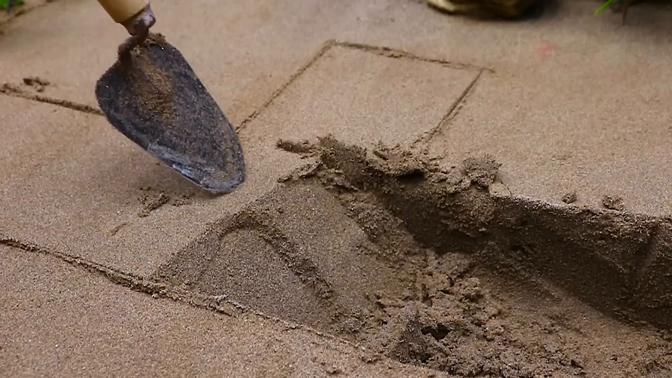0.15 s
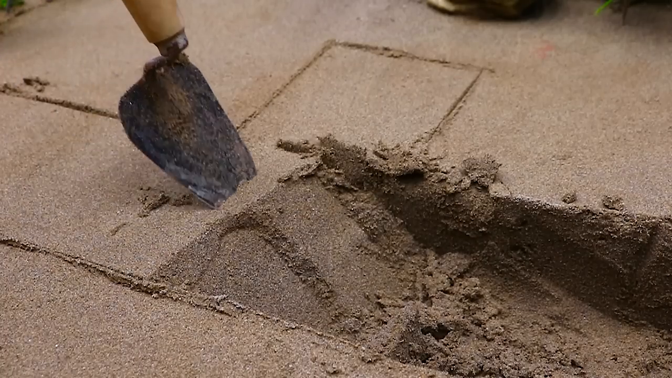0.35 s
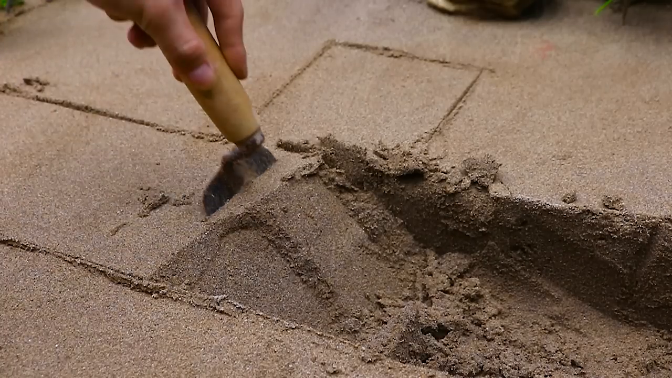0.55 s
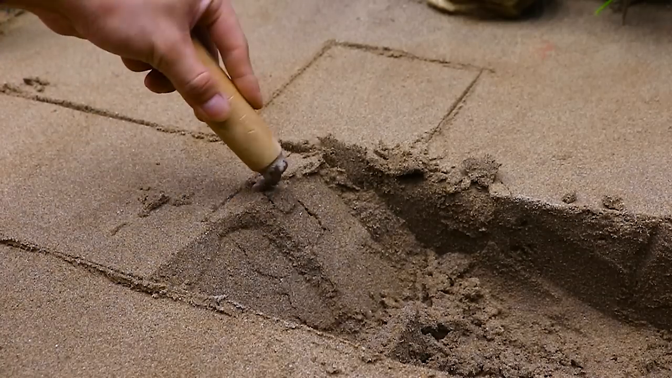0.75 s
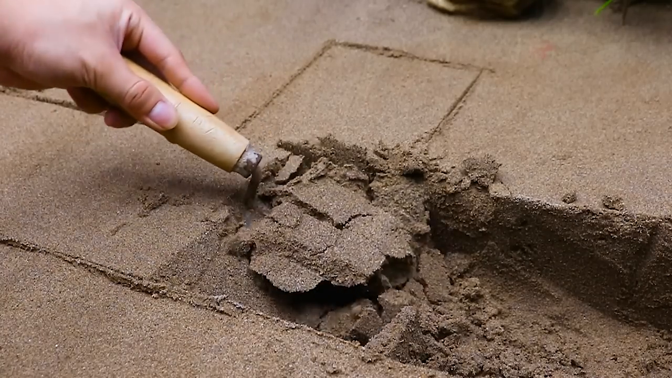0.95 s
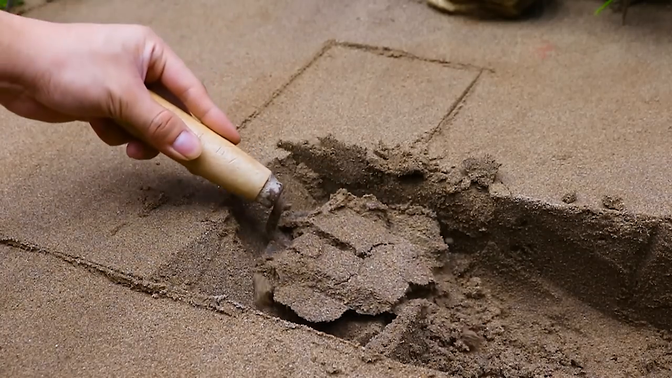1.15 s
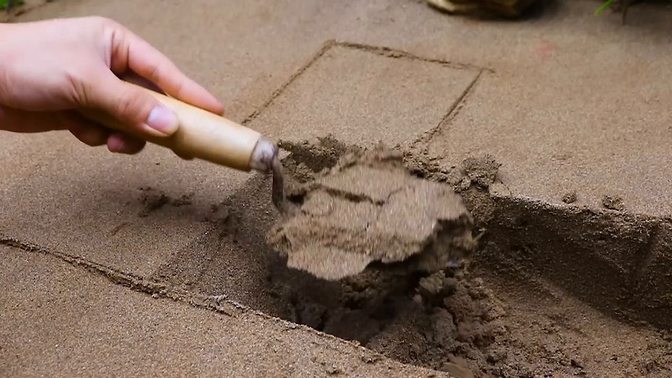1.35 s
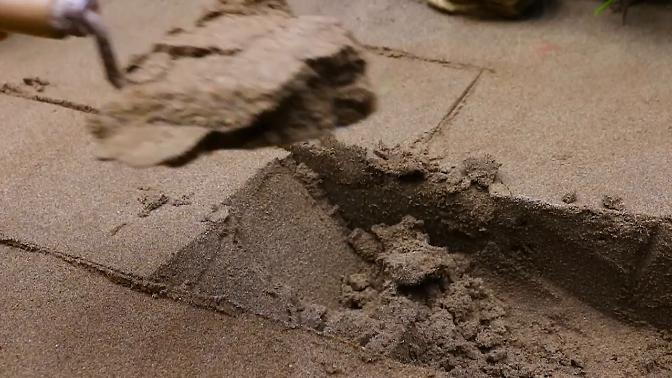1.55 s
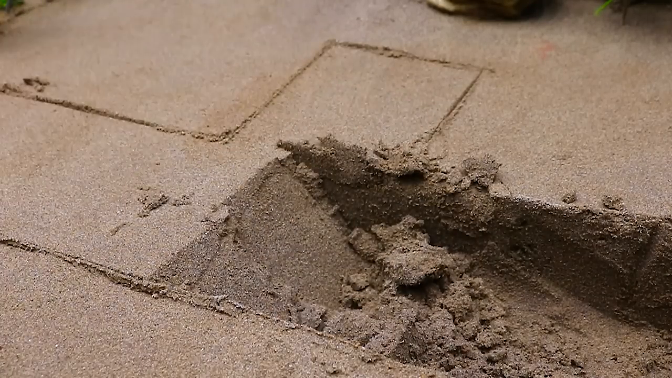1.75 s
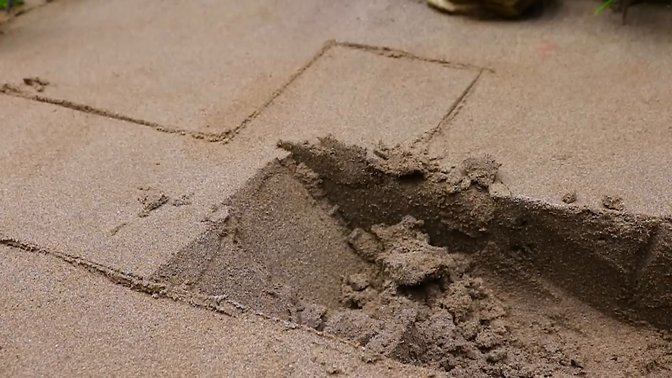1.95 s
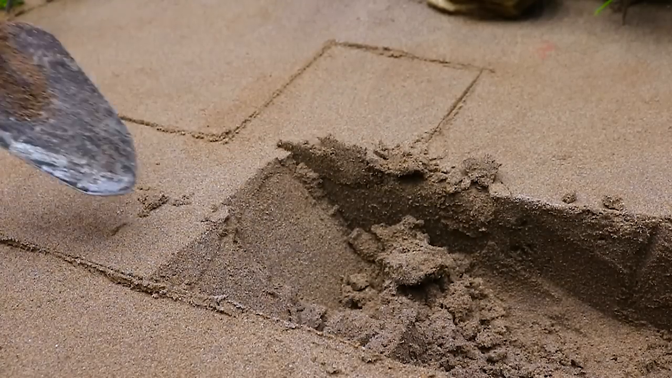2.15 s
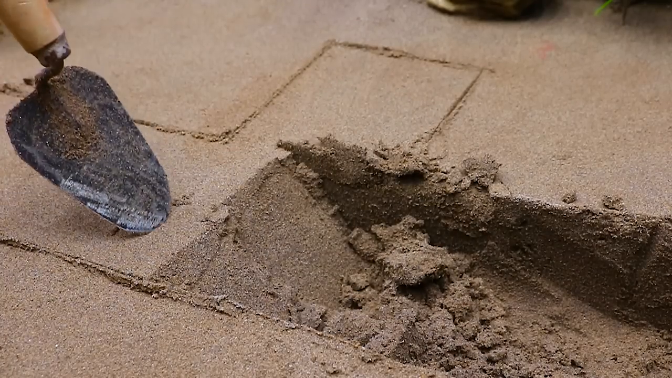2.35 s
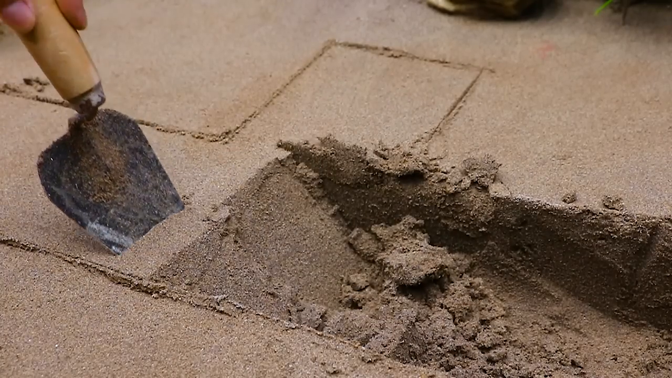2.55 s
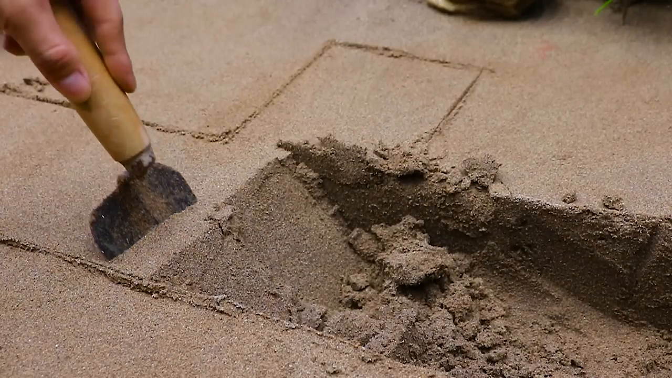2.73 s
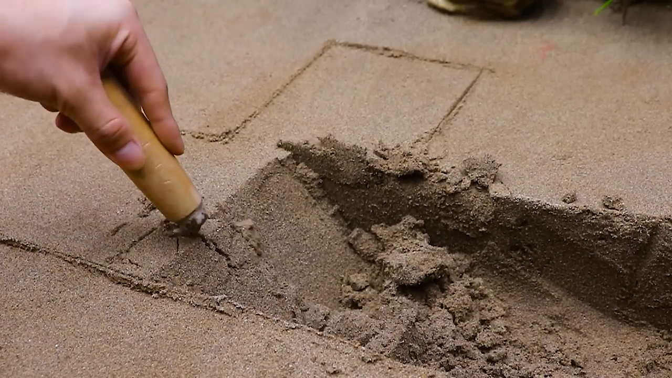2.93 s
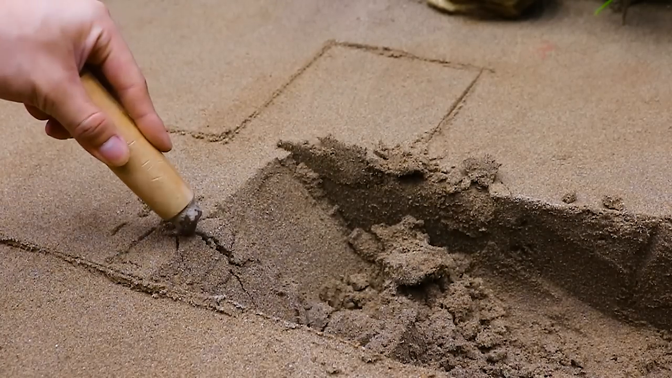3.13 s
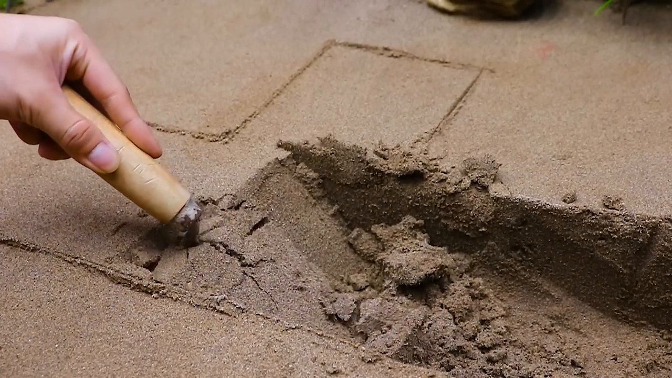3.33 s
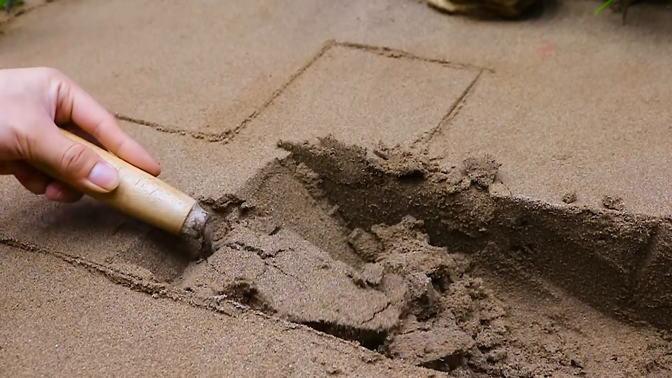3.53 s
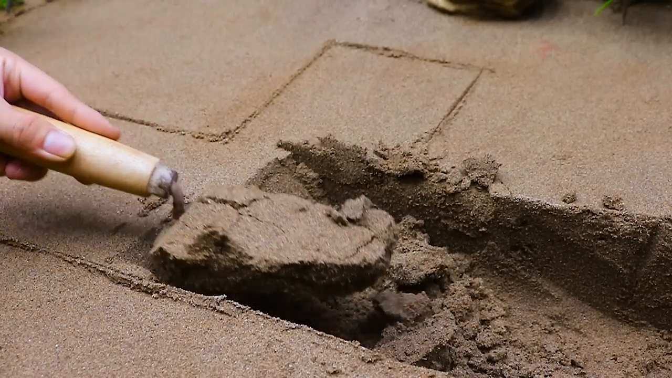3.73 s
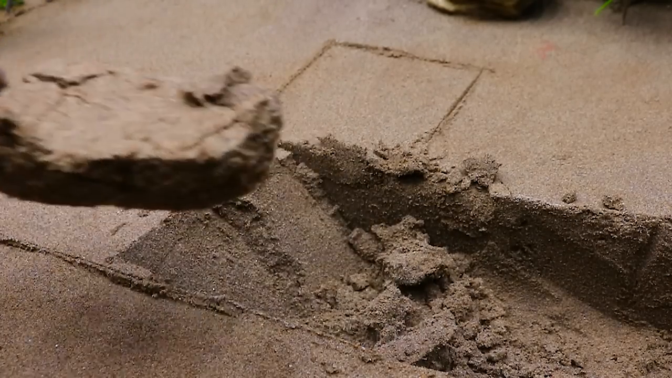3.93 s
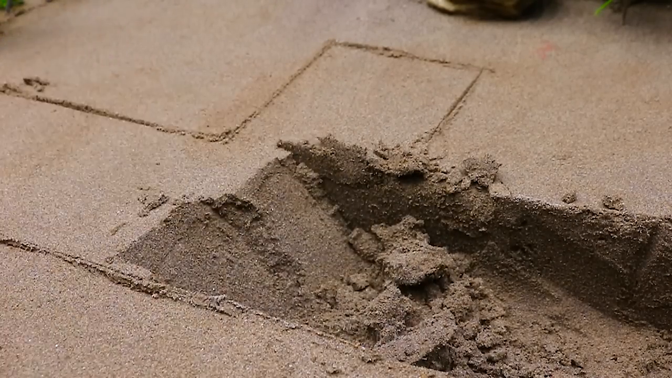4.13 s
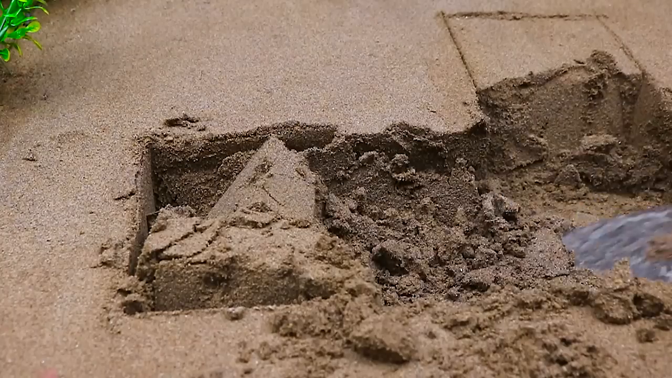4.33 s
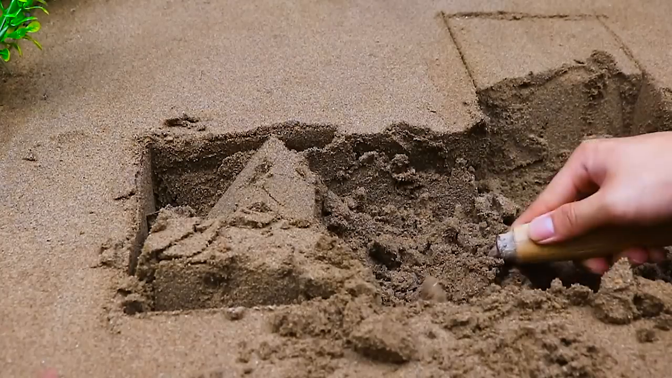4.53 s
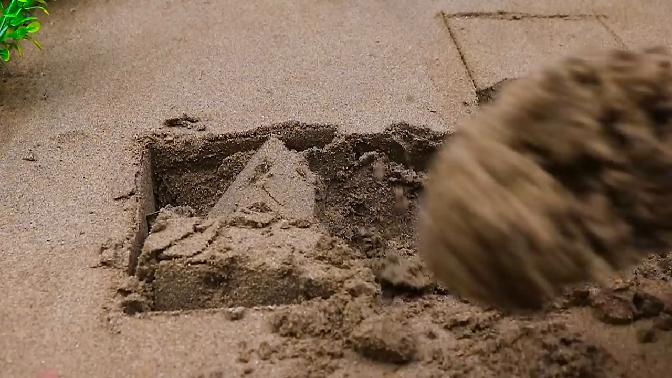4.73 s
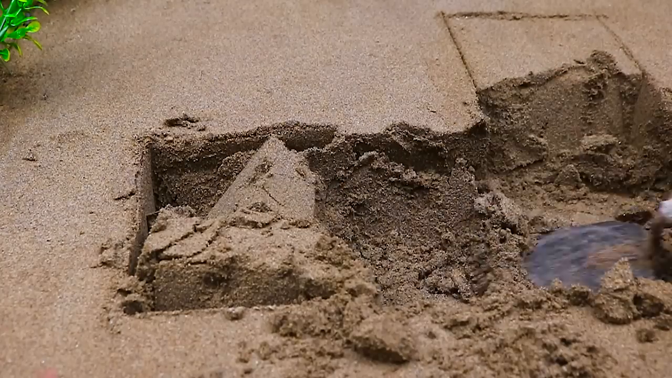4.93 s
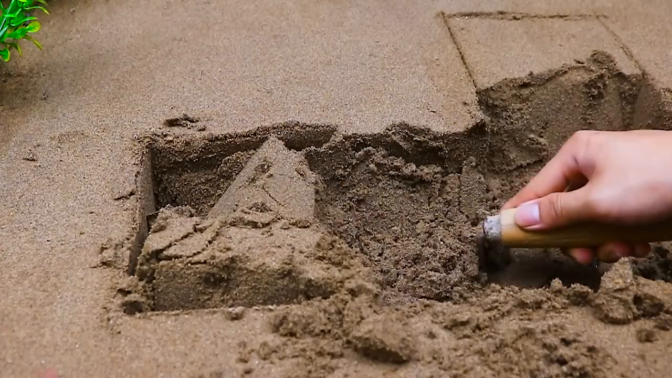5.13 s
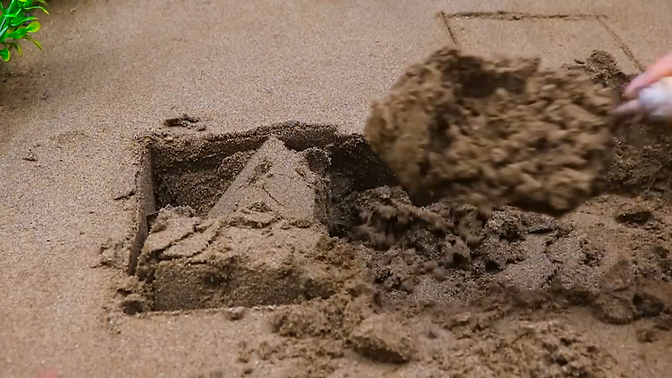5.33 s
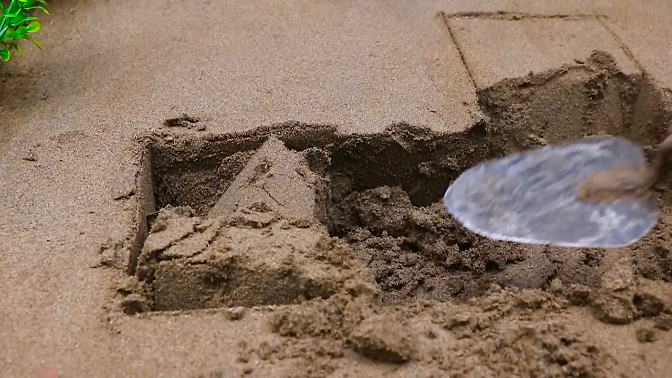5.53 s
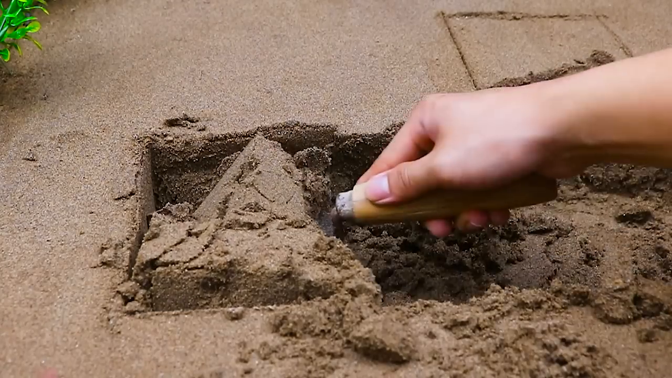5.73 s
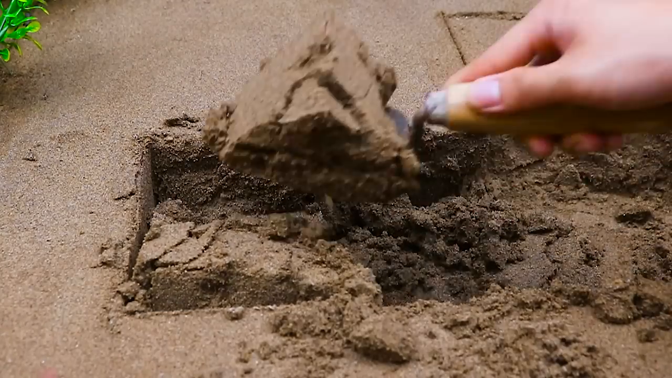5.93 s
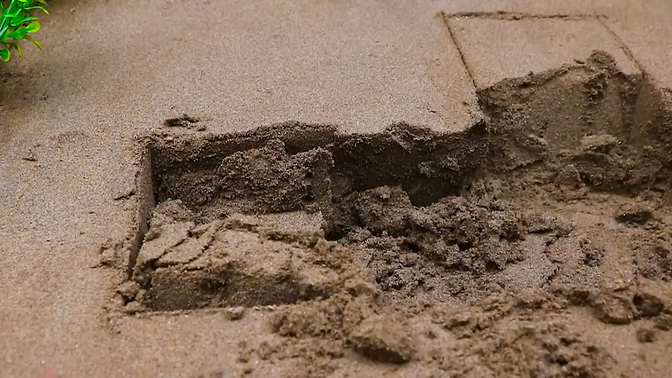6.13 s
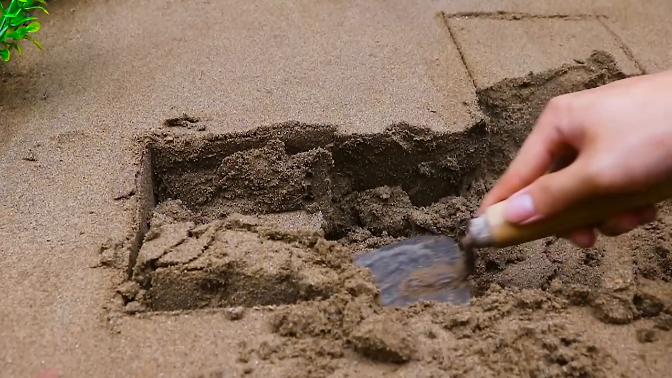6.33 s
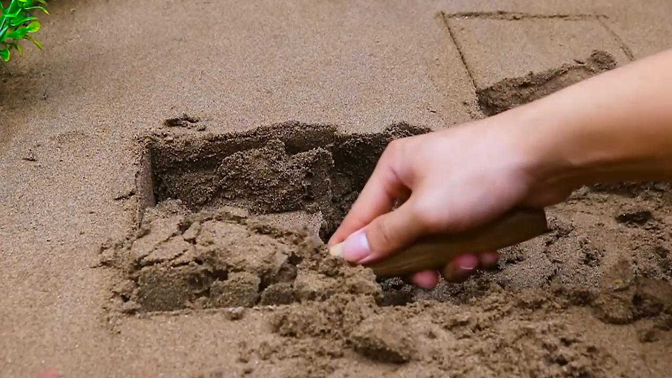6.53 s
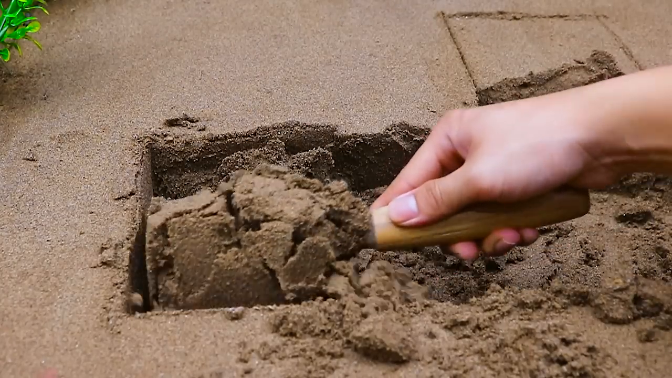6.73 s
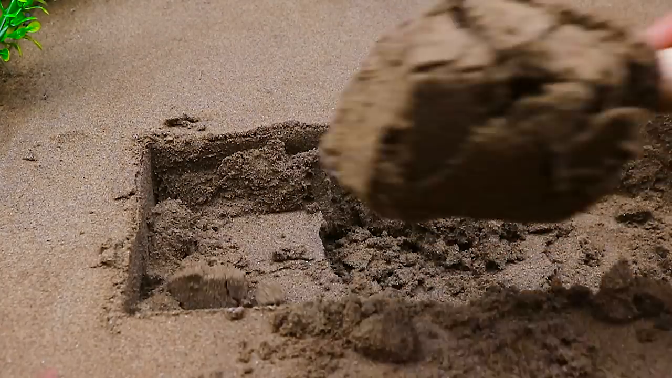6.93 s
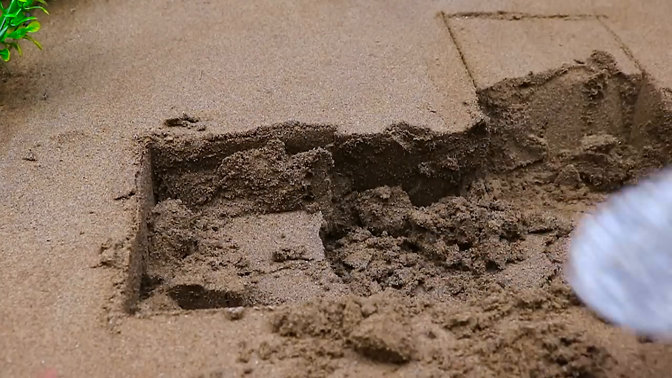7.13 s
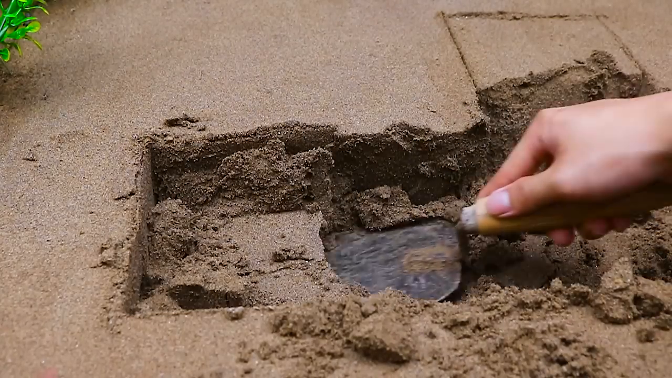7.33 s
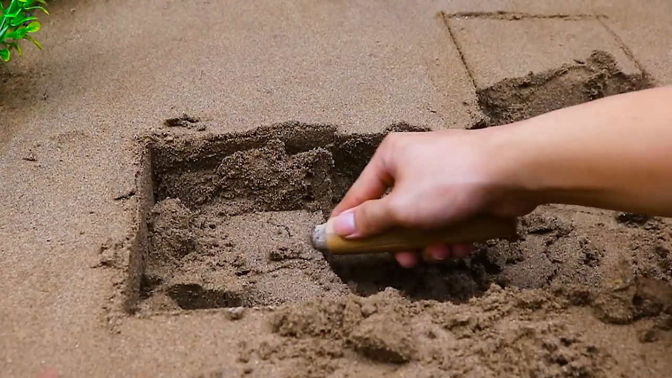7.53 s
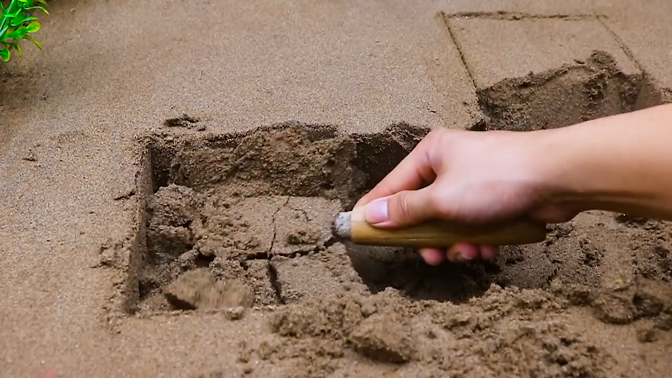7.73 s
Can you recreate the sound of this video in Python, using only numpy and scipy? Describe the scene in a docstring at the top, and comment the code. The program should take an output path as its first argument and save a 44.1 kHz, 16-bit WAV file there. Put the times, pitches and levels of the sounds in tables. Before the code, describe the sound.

A small steel trowel stabs and pushes crisply through damp sand close by, while songbirds chatter over a soft airy outdoor hush.

```python
"""Birds chatter over an airy hush; at 0.4 s a small steel trowel starts digging damp sand close by.
Five quick stabs and two slow pushes: random grain impacts, filtered by blade resonances, hiss, rasp and crunch.
A sine thud marks each stop; noise bursts and grains make the loosened sand, snaps and clods.
Birds are gliding tones with an echo of trees; at 2 to 3 s a low hum, a narrow noise band, swells twice.
At 4 s the filtered-noise hush gives way to a quieter one, and a nearer bird calls twice."""
import sys
import numpy as np
from scipy import signal
from scipy.fft import rfft, irfft, next_fast_len
from scipy.io import wavfile
from scipy.ndimage import uniform_filter1d, map_coordinates

SR = 44100
rng = np.random.default_rng(int(sys.argv[2]) if len(sys.argv) > 2 else 0)


def dump_mix(stems):
    """Bounce the given channels to the path in sys.argv[1] as a 16-bit WAV at rate SR."""
    frames = np.atleast_2d(stems).T  # one column per channel
    limited = np.clip(frames, -1, 1)  # hard clip at full scale
    pcm = np.round(limited * 32767).astype(np.int16)
    wavfile.write(sys.argv[1], SR, pcm)


N = 347067
TOP_HZ = 16000  # recorder band limit

# Open-air hush, spectrum before levelling: (frequency [Hz], relative density [dB])
AIRY_SPECTRUM = [(35, -85.5), (60, -25.5), (129, -28.5), (199, -5.5), (309, 4), (1150, -8), (1560, -6.5),
                 (2200, -8), (2650, -2.5), (3750, -5), (5950, -12.5), (11600, -19), (13400, -23),
                 (15000, -46.5)]
# Quieter hush, likewise: (frequency [Hz], relative density [dB])
CALM_SPECTRUM = [(24, -45.5), (40, -10), (103, -9), (182, -13.5), (568, -9), (1690, -16), (1870, 0),
                 (2340, -17), (2710, -10), (3140, -11.5), (4560, -23), (5160, -24), (5850, -46.5),
                 (15000, -65.5)]
# Level of the airy hush: (time [s], level [dB])
AIRY_LEVEL = [(0, -53), (.35, -53.5), (1.2, -53), (2.05, -55), (2.4, -56), (3.5, -57), (3.994, -56),
              (4.02, -100)]
# Level of the quieter hush: (time [s], level [dB])
CALM_LEVEL = [(3.98, -100), (4.019, -66.5), (5.5, -66.5), (6.3, -69.5), (7.2, -67), (7.87, -60)]
# Swells of the distant hum: (time [s], hold [s], level [dB])
HUM_SWELLS = [(1.8, 0.23, -58.5), (2.6, 0.042, -44)]

# Echo of the trees, before each bird's stretch: (frequency [Hz], t60 [s])
TREE_DECAY = [(1000, 0.82), (2500, 0.92), (5000, 0.77), (10000, 0.35)]
# Far twitter: (start [s], end [s], pitch [Hz], mean level [dB])
TWITTER = [(0, .25, 4210, -64), (0.616, .74, 3850, -59), (1.103, 2.35, 3800, -66),
           (3.142, 3.7, 5080, -70.5), (3.717, 3.92, 4270, -74.5), (6.171, 6.36, 4440, -74.5),
           (6.696, 7.4, 4500, -73)]
# Songbird glides: (time [s], length [s], start [Hz], end [Hz], glide done halfway [share], level [dB])
WHISTLES = [(.243, .022, 2750, 2620, .5, -50), (.638, .025, 4750, 4600, .2, -50),
            (0.932, 0.07, 3090, 2697, 0.98, -31.5), (1.064, 0.062, 2765, 2013, 0.87, -40),
            (1.137, 0.055, 2423, 2907, 1.38, -35), (1.333, .052, 1780, 2300, 0.72, -47.5),
            (1.508, 0.079, 2141, 2590, 0.4, -39.5), (1.663, 0.041, 3970, 4400, 1.2, -47),
            (1.851, .068, 3438, 2955, 0.34, -34.5), (2.102, .034, 1660, 1872, 0.74, -52.5),
            (2.403, 0.072, 2546, 2440, 1.13, -39), (2.828, 0.098, 2184, 2330, .9, -45),
            (2.855, 0.06, 2880, 2784, .5, -50), (2.928, 0.039, 1610, 1686, 1.3, -48),
            (7.137, 0.11, 1927, 1876, 1.4, -69), (7.201, .08, 2775, 2540, .1, -64),
            (7.68, 0.084, 2005, 2355, 1.8, -53)]
# Songbird sweeps: (time [s], middle pitch [Hz], sweep [octaves], level [dB])
CHIPS = [(0.228, 2950, -.4, -52), (.657, 4230, -0.21, -44), (.678, 3450, -.22, -47),
         (.7, 2913, -0.092, -39.5), (.9, 2850, 0.36, -43), (1.038, 3060, 0.45, -41), (1.154, 2907, .2, -35),
         (1.359, 3160, -0.38, -44), (1.5, 3290, -.33, -46.5), (1.574, 2208, -0.55, -40),
         (1.643, 3450, -0.39, -47.5), (1.678, 3150, 0.2, -45.5), (1.783, 3400, -0.55, -44),
         (1.976, 3814, 0.092, -39), (2.025, 3850, -0.27, -53), (2.21, 4200, 0.46, -49),
         (2.236, 3450, 0.27, -43.5), (2.25, 3930, 0.087, -39.5), (2.355, 5700, -0.14, -50.5),
         (2.39, 2753, -0.4, -43), (6.163, 4350, -.2, -62), (6.724, 4380, -0.25, -52.5),
         (7.058, 4500, 0.18, -58), (7.295, 3600, -.2, -62), (7.328, 4560, -.15, -59),
         (7.598, 4560, .1, -54)]
# Runs of weaker chips, up or down by chance: (start [s], end [s], pitch [Hz], mean level [dB])
CHATTER = [(0, .16, 3900, -58), (1.44, 1.8, 4370, -58.5), (1.97, 2.26, 3900, -53)]
CHIP_S = 0.021
CHATTER_GAP_S, CHATTER_SCATTER_OCT, CHATTER_SWEEP_OCT = 0.045, 0.13, 0.33

# Near bird, warble then low slur:
# (warble time [s], level [dB], slur time [s], level [dB], level offset at slur start [dB])
NEAR_CALLS = [(4.083, -31.5, 4.346, -35.5, -0.5), (4.772, -29, 5.047, -35.5, -11.5)]
WARBLE_HZ, SLUR_HZ = (3510, 3873, 2665), (1540, 3000, 1788)  # (start, top, settled)
WARBLE_S, SLUR_S = 0.12, 0.14
FLICK_S, SLIDE_S = 0.021, 0.015  # time up to the top; time constant of the slide down
WARBLE_DEPTH_HZ, WARBLE_ONSET_S = 126, 0.04  # peak swing; time to open up

# Stereo likeness of a broad source: (frequency [Hz], left-right correlation [-1..1])
LIKENESS = [(100, 0.93), (600, 0.9), (1400, 1), (3000, 0.38), (12000, 0.16)]
# Stereo tilt at lean 1, scaled per source: (frequency [Hz], left minus right [dB])
STEREO_TILT = [(100, -1.5), (300, -5), (900, -1.5), (2400, -3.5), (4500, -5), (8000, -4.5), (13000, -5.5)]
# Contact spectrum of grains: (frequency [Hz], relative density [dB])
SAND_SPECTRUM = [(190, -13), (290, -7.5), (430, -8.5), (900, -10.5), (1300, -9.5), (1600, -12),
                 (3000, -12.5), (6000, -11.5), (10000, -10), (15500, -12)]
# Resonances of the buried trowel: (centre [Hz], full width at half the dB gain [Hz], gain [dB])
BLADE_MODES = [(279, 20, 8.5), (360.8, 21, 11), (471.6, 14, 10), (518, 17, 6), (777, 56, 5.5),
               (1096, 73, 5), (1350, 150, 2), (2229, 110, 9), (2388, 400, 6.5), (3267, 36, 10),
               (3510, 160, 6.5), (3520, 80, 1), (3810, 160, 4), (4867, 72, 12.5), (5310, 240, 8),
               (5650, 86, 4.5), (5790, 50, 10.5), (6280, 98, 10.5), (6920, 220, 5.5), (7210, 80, 4.5),
               (8000, 83, -0.5), (9120, 400, 2.5), (9630, 180, 6), (10430, 100, 3), (10730, 55, -11.5),
               (11330, 90, -2.5), (13200, 120, 1.5)]
# Brightness of loose grains on the blade: (frequency [Hz], gain [dB])
LOOSE_BRIGHTNESS = [(500, -1), (1500, -4.5), (4000, -2), (9000, 0), (15000, -2.5)]
# Sand trickling from a lifted clod: (time [s], hold [s], nominal level [dB])
TRICKLES = [(0.703, 0.077, -44), (0.879, 0.076, -49.5), (2.853, 0.19, -52), (3.08, 0.36, -46),
            (3.502, 0.13, -51.5)]
TRICKLE_ATTACK_S, TRICKLE_T60_S = 0.089, 0.27
# Coarse grains snapping on steel: (time [s], nominal peak, before a 6.5 dB trim [dB])
SNAPS = [(2.447, -31), (3.2624, -25.5), (3.3233, -23.5), (3.383, -20.5), (3.3914, -29), (3.4235, -29),
         (3.5036, -31), (3.5424, -30.5), (3.6, -33), (6.348, -25.5)]
# Lumps dropping into the pit: (time [s], nominal level, before an 8 dB boost [dB])
CLOD_DROPS = [(.945, -42.5), (0.975, -45.5), (1.046, -51.5), (6.325, -62.5)]
# Spectrum of a dropped lump: (frequency [Hz], relative density [dB])
CLOD_SPECTRUM = [(40, -9), (120, -19.5), (330, -1), (1000, -12.5), (2500, -13), (8000, -36.5)]

# Layers of a stab, rows crunch, rasp, hiss; climb and release cross at the peak, 3 dB below nominal:
# (contact to peak [s], nominal peak [dB], climb over that time [dB], release [dB/s])
STAB_LAYERS = [(0.087, -27, 17.5, 190.5), (.1, -23, 7, 560), (.095, -21.5, 4, 619.5)]
# Layers of a push, same rows:
# (contact to peak [s], nominal peak [dB], climb over that time [dB], release [dB/s])
PUSH_LAYERS = [(0.23, -24.5, 26.4, 229), (0.23, -27, 7.2, 250), (0.2, -26, 5.5, 240)]
# Stabs: (contact time [s])
STAB_TIMES = [0.3794, 4.379, 4.9795, 5.6996, 7.4196]
# Pushes: (contact time [s])
PUSH_TIMES = [2.446, 6.347]
# Sand settles after a stab, then the clod tears loose:
# (time after contact [s], hold [s], t60 [s], rasp [dB], crunch over rasp [dB])
STAB_RUSTLES = [(.14, 0.043, 0.36, -50, -3.5), (0.299, 0.075, 0.65, -50.5, -8)]
# The same after a push:
# (time after contact [s], hold [s], t60 [s], rasp [dB], crunch over rasp [dB])
PUSH_RUSTLES = [(.3, 0.19, 0.32, -54.5, 1.5), (0.448, 0.021, 0.48, -45.5, -14), (.64, .05, .3, -62, -17)]
CONTACT_S = 0.008  # time constant of the tip breaking the crust
RUSTLE_ATTACK_S, RUSTLE_HISS_DB = 0.029, -4.5  # rise; hiss over rasp
RING_S = 0.15  # time constant: once the blade has stopped, ever fewer grains strike it


def amp(db):
    """Decibels to amplitude."""
    return 10 ** (np.asarray(db) / 20)


def unit(x):
    """Scale to an RMS of 1."""
    return x / np.sqrt(np.mean(x ** 2) + 1e-20)


def along(points, hz):
    """Interpolate (Hz, value) points on a log frequency axis."""
    f, v = np.transpose(points)
    return np.interp(np.log(hz + 1), np.log(f + 1), v)


def curves(rows, t):
    """Each column after the time, read at the times t."""
    s, *cols = np.transpose(rows)
    return [np.interp(t, s, c) for c in cols]


def clock(length_s):
    """Sample times of a sound of this length."""
    return np.arange(int(length_s * SR)) / SR


def fade(t, edge_s):
    """Linear ramps at both ends."""
    return np.clip(np.minimum(t - t[0], t[-1] - t) / edge_s, 0, 1)


def swell(t, attack_s, hold_s, t60_s):
    """Gain that rises from t = 0, holds, then dies away."""
    decay = amp(-60 * np.maximum(t - attack_s - hold_s, 0) / t60_s)
    return np.clip(t / attack_s, 0, 1) ** 2 * decay


def wobble(rate_hz, n):
    """Smooth random curve with rate_hz knots a second."""
    knots = rng.standard_normal(int(n * rate_hz / SR) + 4)
    return map_coordinates(knots, [np.arange(n) * rate_hz / SR])


def add(track, s, sound):
    """Mix a sound into a track at s seconds."""
    i = max(round(s * SR), 0)
    track[..., i:i + sound.shape[-1]] += sound[..., :max(N - i, 0)]


def coloured(x, gain):
    """Minimum-phase filter with this gain of frequency, built by folding the cepstrum."""
    m = 2 * next_fast_len(x.shape[-1] // 2 + 4096)
    cep = irfft(np.log(np.maximum(gain(np.fft.rfftfreq(m, 1 / SR)), 1e-5)), m)
    cep[..., 1:m // 2] *= 2
    cep[..., m // 2 + 1:] = 0
    return irfft(rfft(x, m) * np.exp(rfft(cep)), m)[..., :x.shape[-1]]


def band(hz, lo, hi, order=8):
    """Gain of a band; a higher order has steeper skirts."""
    low_side = 1 + (lo / (hz + 1)) ** order
    high_side = 1 + (hz / hi) ** order
    return (low_side * high_side) ** -.5


def placed(pair, lean):
    """Two unrelated streams become one broad source, nearer to the right microphone."""
    n = pair.shape[-1]
    hz = np.fft.rfftfreq(n, 1 / SR)
    turn = np.arccos(np.clip(along(LIKENESS, hz), 0, .99)) / 2
    mid, side = rfft(pair) * [np.cos(turn), np.sin(turn)]
    tilt = amp(lean * along(STEREO_TILT, hz) / 2)
    late = np.exp(-2j * np.pi * hz * 4 / SR)  # left lags by 4 samples
    return unit(irfft([(mid + side) * tilt * late, (mid - side) / tilt], n))


def hush(spectrum, level, side_db, patchy_db):
    """Distant leaves and air: shaped noise drifting in soft patches of time and frequency."""
    z = signal.stft(rng.standard_normal((2, N)), nperseg=512)[2]
    field = uniform_filter1d(rng.standard_normal(z.shape[1:]), size=5, axis=0)
    field = uniform_filter1d(field, size=16, axis=1)
    pair = signal.istft(z * amp(patchy_db * unit(field)), nperseg=512)[1][:, :N]
    mid, side = coloured(pair, lambda hz: amp(along(spectrum, hz)))
    level_db = curves(level, np.arange(N) / SR)[0]
    return amp(level_db) * unit(mid + amp(side_db) * np.array([side, -side]))


def low_hum():
    """A narrow band of far-off noise that comes and goes."""
    t = np.arange(N) / SR
    hum = unit(coloured(rng.standard_normal(N), lambda hz: band(hz, 396, 380)))
    return hum * sum(amp(db) * swell(t - s, attack_s=.13, hold_s=hold, t60_s=0.37)
                     for s, hold, db in HUM_SWELLS)


def whistle(hz, overtone_db):
    """A bird's nearly pure tone with a slightly unsteady pitch; each higher overtone is weaker."""
    phase = 2 * np.pi * np.cumsum(hz * (1 + 0.013 * wobble(300, len(hz)))) / SR
    overtones = np.sin(2 * phase) + amp(-9) * np.sin(3 * phase) + amp(-16) * np.sin(4 * phase)
    return np.sqrt(2) * (np.sin(phase) + amp(overtone_db) * overtones)


def echoed(x, wet_db, stretch, side_db, early_db):
    """A centred call, blurred by the ground and near trunks, with the diffuse answer of the trees."""
    hz, t, z = signal.stft(rng.standard_normal((2, 2 * SR)), SR, nperseg=256)
    t60_s = stretch * along(TREE_DECAY, hz)[:, None]
    tail = signal.istft(z * amp(-60 * t / t60_s), SR, nperseg=256)[1]
    tail = tail / np.linalg.norm(tail[0])
    mid, side = signal.fftconvolve(x[None], tail, axes=1)[:, :N]
    near = x.copy()
    for delay_s in rng.uniform(0.0024, 0.024, size=6):
        add(near, delay_s, amp(early_db) * x)
    return near + amp(wet_db) * (mid + amp(side_db) * np.array([side, -side]))


def syllable(length_s, pitches_hz, flutter_db):
    """One note on a parabola through three pitches, fluttering in strength."""
    t = clock(length_s)
    u = t / length_s
    pitch_hz = np.polyval(np.polyfit([0, .5, 1], pitches_hz, 2), u)
    strength = amp(flutter_db * wobble(158, len(t))) * np.sin(np.pi * u) ** 0.12
    return unit(strength * whistle(pitch_hz, overtone_db=-39.5))


def chip(hz, octaves):
    """A short note sweeping through its middle pitch."""
    return syllable(CHIP_S, hz * 2 ** (octaves * np.array([-.5, 0, .5])), flutter_db=4.5)


def songbirds():
    """Short syllables from the trees, over a blurred twitter of quick ones further off."""
    song, far = np.zeros(N), np.zeros(N)
    for s, length_s, start_hz, end_hz, bend, db in WHISTLES:
        pitches_hz = [start_hz, start_hz + bend * (end_hz - start_hz), end_hz]
        add(song, s, amp(db) * syllable(length_s, pitches_hz, flutter_db=2))
    for s, hz, octaves, db in CHIPS:
        add(song, s, amp(db) * chip(hz, octaves))
    for start, end, hz, db in CHATTER:
        for s in np.arange(start, end, CHATTER_GAP_S):
            late, size, high, way = rng.standard_normal(4)
            note = chip(hz * 2 ** (CHATTER_SCATTER_OCT * high), CHATTER_SWEEP_OCT * np.sign(way))
            add(song, s + 0.016 * late, amp(db + 2 * size) * note)
    for start, end, hz, db in TWITTER:
        for s in np.arange(start, end, .03):
            late, size, *bend = rng.standard_normal(5)
            note = syllable(0.014, hz * np.exp(0.071 * np.array(bend)), flutter_db=-0.5)
            add(far, s + 0.0087 * late, amp(db + 2 * size) * note)
    twitter = echoed(far, wet_db=7, stretch=.5, side_db=-35, early_db=-9)
    return echoed(song, wet_db=-5.0, stretch=0.8, side_db=-62, early_db=-16) + twitter


def hook(t, pitches_hz):
    """Pitch that flicks up to its top and slides down to settle."""
    start, top, settled = pitches_hz
    flick = start + (top - start) * t / FLICK_S
    slide = settled + (top - settled) * np.exp((FLICK_S - t) / SLIDE_S)
    return np.where(t < FLICK_S, flick, slide)


def near_note(length_s, pitches_hz, db, depth_hz, attack_s, soft_db, sag_db):
    """One near-bird note: ramped level at both ends, pitch and strength warbling in opposition."""
    t = clock(length_s)
    level_db = db + soft_db * np.maximum(1 - t / attack_s, 0) + sag_db * (t / length_s) ** 4
    warble_hz = depth_hz * np.minimum(t / WARBLE_ONSET_S, 1) ** 4
    warble = np.sin(2 * np.pi * 59 * t)
    flutter_db = 1.1 * wobble(350, len(t))
    overtone_db = -22.0 + 0.49 * level_db  # louder parts have more edge
    strength = amp(level_db - warble * warble_hz / 90 + flutter_db) * fade(t, 0.0038)
    return strength * whistle(hook(t, pitches_hz) + warble_hz * warble, overtone_db)


def near_bird():
    """Two loud warbled calls, each with its slur, ringing on among the trees."""
    song = np.zeros(N)
    for warble_s, warble_db, slur_s, slur_db, soft_db in NEAR_CALLS:
        add(song, warble_s, near_note(WARBLE_S, WARBLE_HZ, warble_db, depth_hz=WARBLE_DEPTH_HZ,
                                      attack_s=0.04, soft_db=-21.5, sag_db=2))
        add(song, slur_s, near_note(SLUR_S, SLUR_HZ, slur_db, depth_hz=0,
                                    attack_s=.04, soft_db=soft_db, sag_db=-14.5))
    return echoed(song, wet_db=-8.5, stretch=2.18, side_db=-9.5, early_db=-11.5)


def grains(n, rate_hz, spread_db):
    """Two streams of tiny random impacts, their sizes spread exponentially in dB."""
    hit = rng.random((2, n)) < rate_hz / SR
    size = amp(spread_db * np.minimum(rng.exponential(size=(2, n)), 4))
    return unit(hit * size * rng.choice([-1, 1], (2, n)))


def trowel(hz):
    """Gain of the sand's contact spectrum through the blade's resonances."""
    modes_db = sum(db / (1 + (2 * (hz - c) / w) ** 2) for c, w, db in BLADE_MODES)
    return amp(along(SAND_SPECTRUM, hz) + modes_db)


def trickle(hold_s):
    """Loose grains fall in small clumps and strike the blade, over a faint ground rumble."""
    t = clock(TRICKLE_ATTACK_S + hold_s + TRICKLE_T60_S / 2)
    n = len(t)
    spill = grains(n, rate_hz=2800, spread_db=-2) * amp(1.9 * wobble(70.2, n))
    fall = coloured(spill, lambda hz: trowel(hz) * amp(along(LOOSE_BRIGHTNESS, hz))
                    * band(hz, 400, 18000, order=2))
    ground = coloured(rng.standard_normal((2, n)), lambda hz: band(hz, 28, 143, order=4))
    envelope = swell(t, TRICKLE_ATTACK_S, hold_s, TRICKLE_T60_S) * fade(t, .01)
    return envelope * (placed(fall, lean=0.67) + amp(-13.5) * placed(ground, lean=.3))


def crumbs():
    """Sand trickles off the blade, single grains snap and soft lumps land."""
    out = np.zeros((2, N))
    for s, hold_s, db in TRICKLES:
        add(out, s, amp(db) * trickle(hold_s))
    t = clock(0.089)
    for s, db in SNAPS:
        noise = rng.standard_normal((2, len(t)))
        snap = placed(coloured(noise, lambda hz: trowel(hz) * band(hz, 2700, 19000, order=2)), lean=7.1)
        add(out, s, amp(db - 6.5 - 60 * t / 0.019) * snap)
    for s, db in CLOD_DROPS:
        noise = rng.standard_normal((2, len(t)))
        puff = placed(coloured(noise, lambda hz: amp(along(CLOD_SPECTRUM, hz))), lean=0.49)
        add(out, s, amp(db + 8 - 60 * t / 0.18) * fade(t, 0.0085) * puff)
    return out


def thrust(t, layers, rustles, contact_db):
    """Crunch, rasp and hiss levels in dB: contact, climb with depth, release, rustles of loosened sand."""
    peak_s, peak_db, climb_db, release = np.transpose(layers)[:, :, None]
    climb = amp(climb_db * (t / peak_s - 1))
    fall = amp(-release * (t - peak_s))
    cutting = amp(peak_db + contact_db * np.exp(-t / CONTACT_S)) / np.hypot(1 / climb, 1 / fall)
    loose = sum(amp([[db + crunch_db], [db], [db + RUSTLE_HISS_DB]])
                * swell(t - s, RUSTLE_ATTACK_S, hold_s, t60_s)
                for s, hold_s, t60_s, db, crunch_db in rustles)
    return 20 * np.log10(cutting + loose)


def stroke(layers, rustles, length_s, contact_db, ring, lean, stop_s, stop_db, stop_hz, stop_width_s,
           slip_db, rumble_db, muffle_db):
    """One thrust: fine grains hiss, coarse ones rasp, packed sand crunches and thuds as the blade stops."""
    t = clock(length_s)
    n = len(t)
    crunch_db, rasp_db, hiss_db = thrust(t, layers, rustles, contact_db)
    slip = wobble(152.1, n)  # the blade advances in tiny jerks
    touching = ring * np.exp(-np.maximum(t - stop_s, 0) / RING_S)

    def layer(lo, hi, rate_hz, spread_db):
        """Grains of one size: some ring the blade, the others only rub on sand."""
        jerks = amp(slip_db * (slip + wobble(260, n)) / np.sqrt(2))
        hits = grains(n, rate_hz, spread_db) * jerks
        on_steel = coloured(hits, lambda hz: trowel(hz) * band(hz, lo, hi))
        on_sand = coloured(hits, lambda hz: amp(along(SAND_SPECTRUM, hz)) * band(hz, lo, hi))
        return touching * placed(on_steel, lean) + (1 - touching) * placed(on_sand, lean)

    crunch = amp(crunch_db) * layer(201, 1610, rate_hz=2000, spread_db=2.5)
    rasp = amp(rasp_db) * layer(1730, 4310, rate_hz=5000, spread_db=4.0)
    # the deeper the blade is buried, the more the sand muffles its finest hiss
    bright = amp(-muffle_db * np.minimum(t / (0.62 * stop_s), 1) ** 2)
    sizzle = bright * layer(10500, 18000, rate_hz=11000, spread_db=1.5)
    fine = layer(4800, 10130, rate_hz=7900, spread_db=-1.5)
    hiss = amp(hiss_db) * (fine + sizzle) / np.hypot(1, bright)
    # the ground rumbles with the load on the blade
    ground = coloured(rng.standard_normal((2, n)), lambda hz: band(hz, 46, 175, order=4))
    rumble = amp(rumble_db + 0.41 * crunch_db) * placed(ground, lean / 2)
    bump = np.exp(-((t - stop_s) / stop_width_s) ** 2)
    thud = amp(stop_db) * bump * np.sin(2 * np.pi * stop_hz * t)
    mix = crunch + rasp + hiss + rumble + thud * amp([[-2 * lean], [2 * lean]])
    return mix * fade(t, 0.003) * np.clip((t[-1] - t) / 0.047, 0, 1)


def digging():
    """One stab and one push, each repeated alike at its moments."""
    out = np.zeros((2, N))
    stab = stroke(STAB_LAYERS, STAB_RUSTLES, length_s=.53, contact_db=5.0, ring=0.96, lean=0.97,
                  stop_s=0.089, stop_db=-24, stop_hz=268, stop_width_s=0.0105,
                  slip_db=0, rumble_db=-38.5, muffle_db=10.5)
    push = stroke(PUSH_LAYERS, PUSH_RUSTLES, length_s=.78, contact_db=-19, ring=0.64, lean=0.5,
                  stop_s=0.216, stop_db=-29, stop_hz=305, stop_width_s=0.009,
                  slip_db=2.0, rumble_db=-40.5, muffle_db=10.0)
    for gesture, moments in (stab, STAB_TIMES), (push, PUSH_TIMES):
        for s in moments:
            add(out, s, gesture)
    return out


def scene():
    """The digging in front, birds, hum and air behind."""
    air = hush(AIRY_SPECTRUM, AIRY_LEVEL, side_db=-50.5, patchy_db=1.5)
    air = air + hush(CALM_SPECTRUM, CALM_LEVEL, side_db=-16.5, patchy_db=1)
    return digging() + crumbs() + songbirds() + near_bird() + low_hum() + air


def record(dry):
    """The recorder rolls off smoothly around its band limit."""
    m = next_fast_len(N + SR // 2)
    passed = (1 - np.tanh((np.fft.rfftfreq(m, 1 / SR) - TOP_HZ) / 120)) / 2
    return irfft(rfft(dry, m) * passed, m)[:, :N]


dry = scene()
out = record(dry)
dump_mix(out)
```